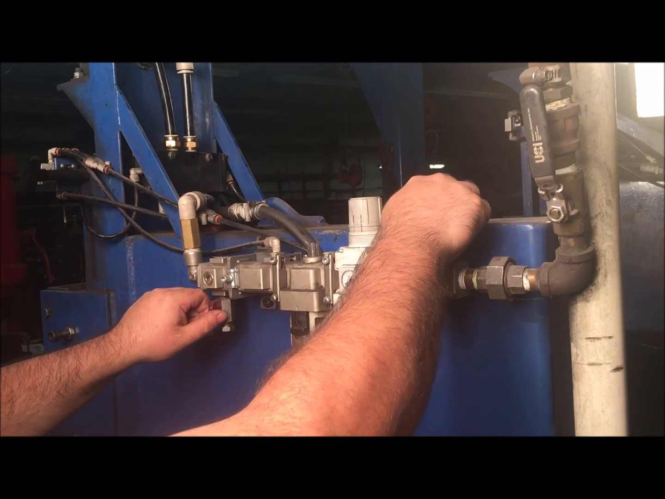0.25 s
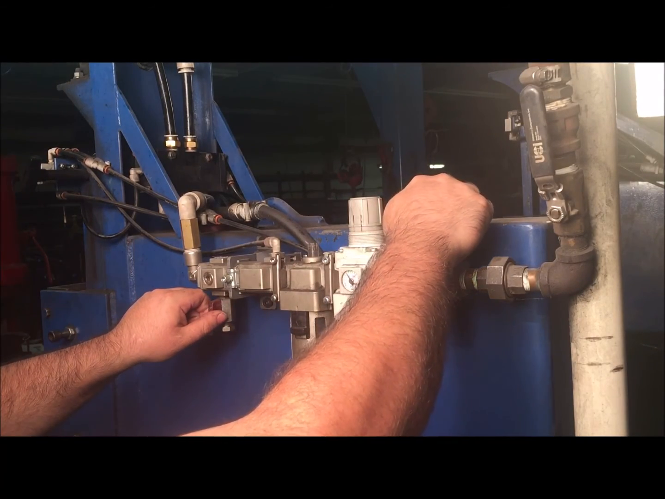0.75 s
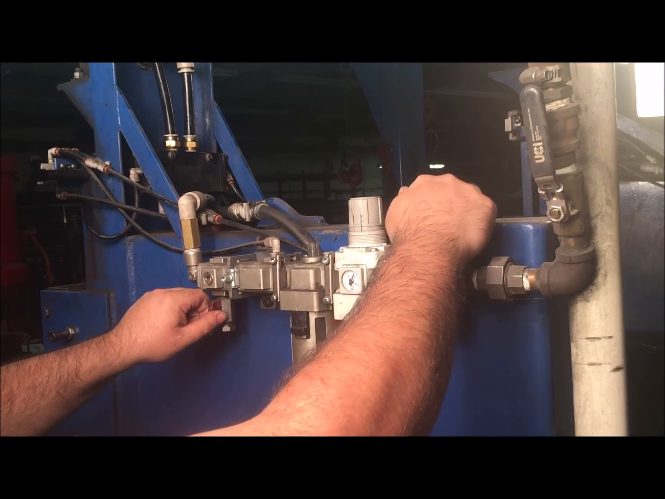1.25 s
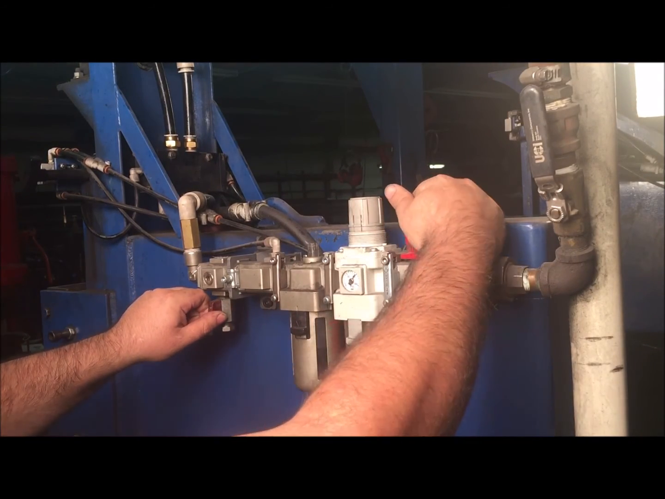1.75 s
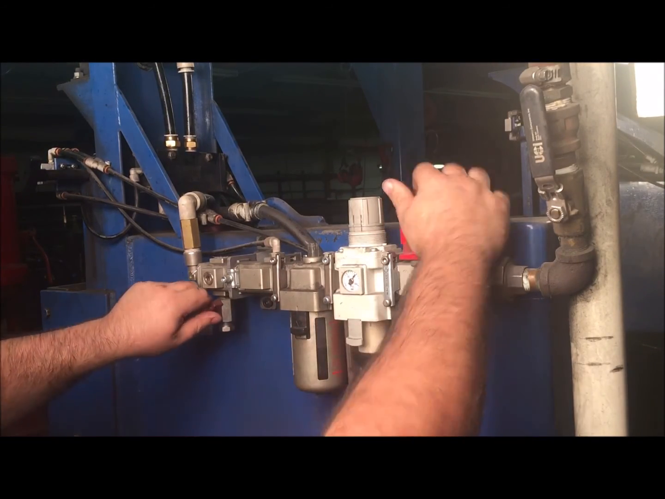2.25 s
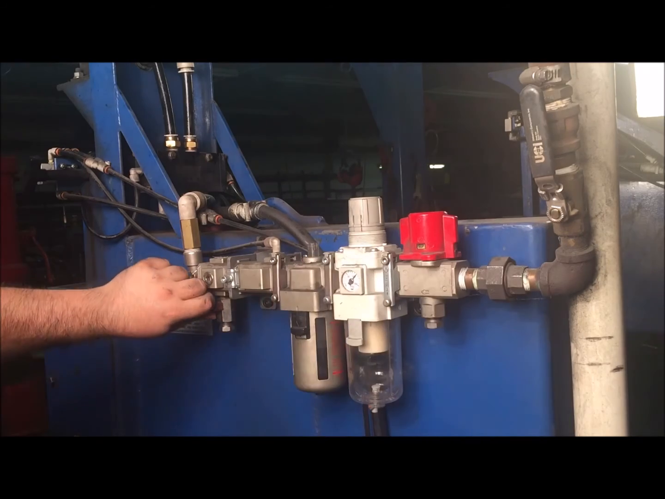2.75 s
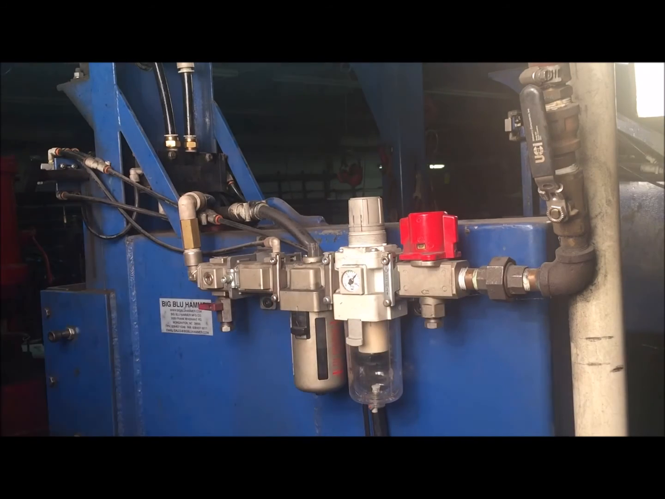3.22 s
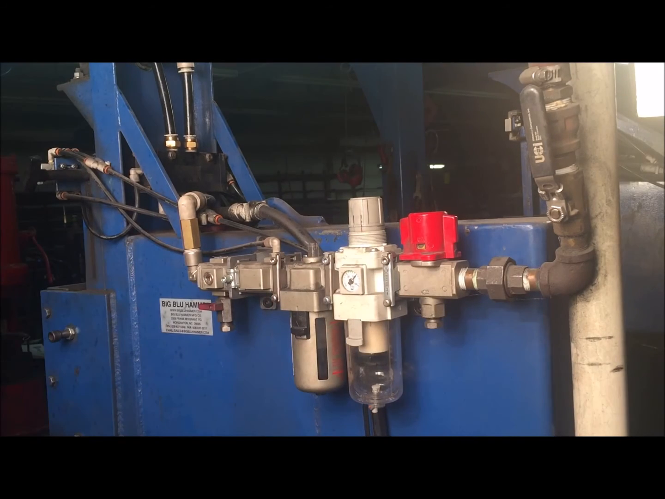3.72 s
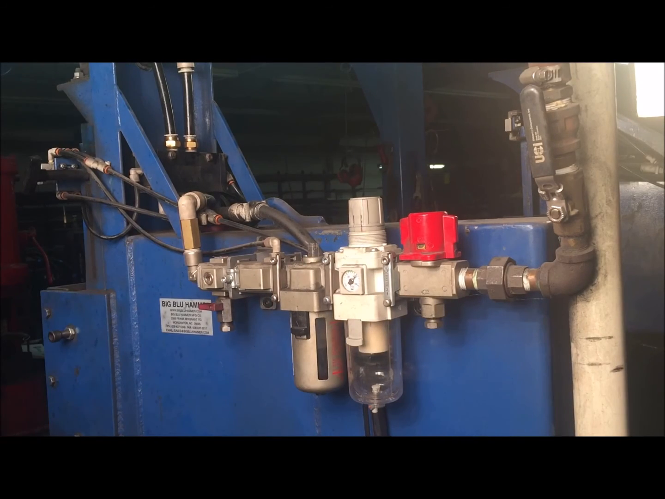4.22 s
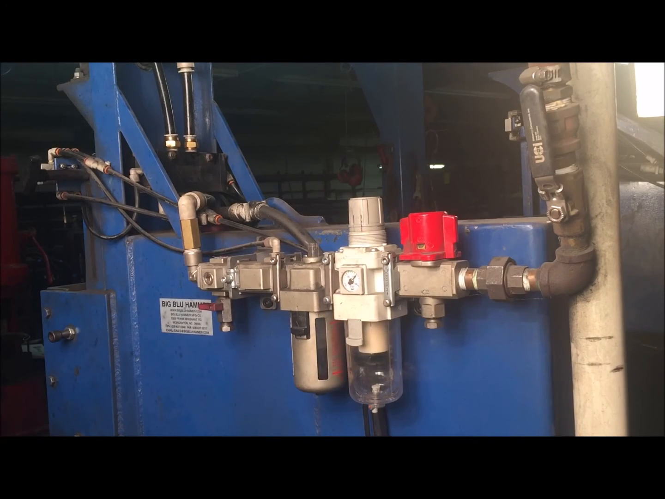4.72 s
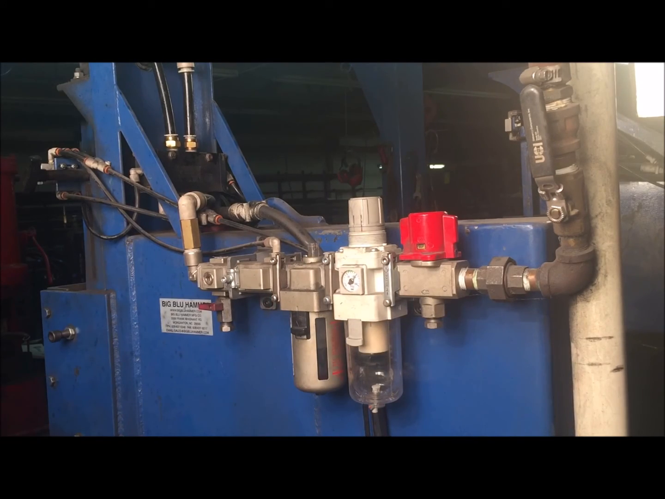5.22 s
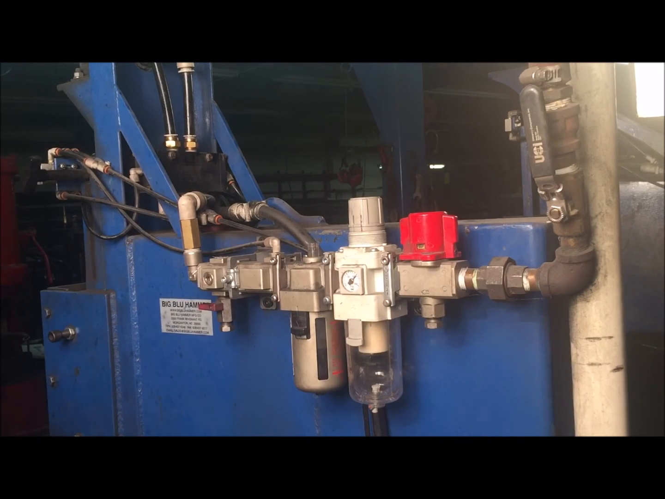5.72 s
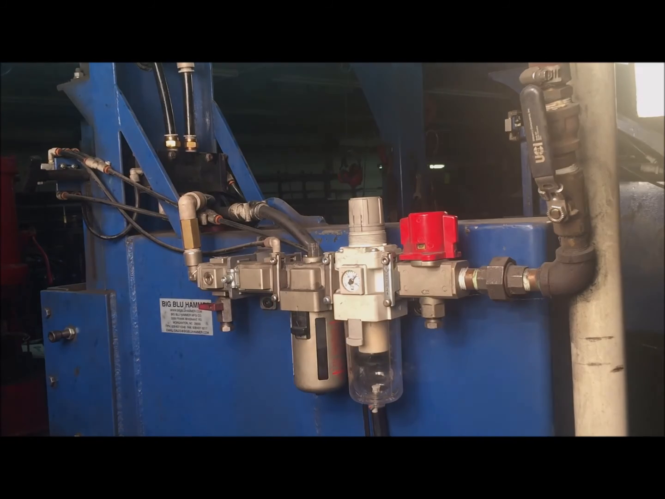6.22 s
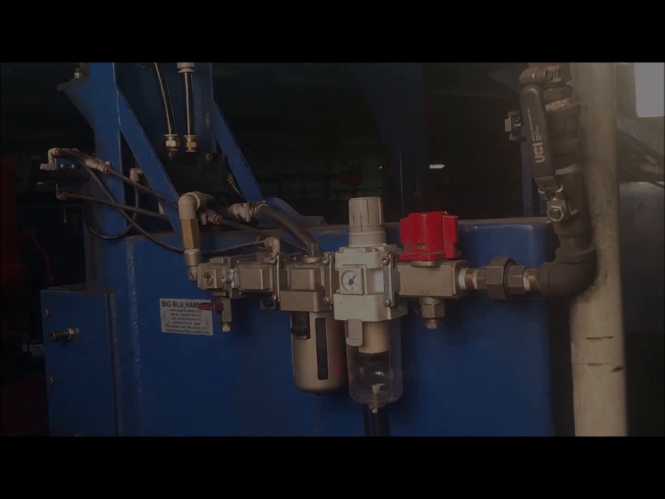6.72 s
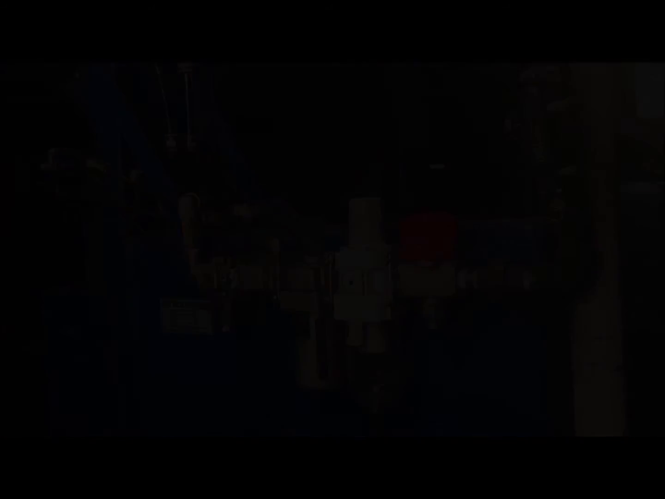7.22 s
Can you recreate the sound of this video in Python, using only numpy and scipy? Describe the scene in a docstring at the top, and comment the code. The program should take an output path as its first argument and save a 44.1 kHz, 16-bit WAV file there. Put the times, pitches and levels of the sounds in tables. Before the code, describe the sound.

Compressed air hisses into a pneumatic power hammer, valve chatters, ram clunks; then exhaust shrieks, the ram cycles freely and lands seven ringing steel blows.

```python
"""A pneumatic power hammer in a workshop, heard through one microphone with faint shop noise and distant motors behind.
The supply valve opens: noise-made air hisses and rumbles in, the valve chatters, and the ram clunks onto its stop.
Then the exhaust hisses and whistles and the valve puffs and clacks once a stroke. The ram slides freely five times,
then lands seven blows: struck modes and decaying noise ring the frame and push the recorder into its limiter.
Just before the end everything but the background breaks off."""
import sys
import numpy as np
from scipy import signal
from scipy.fft import rfft, irfft, next_fast_len
from scipy.io import wavfile
from scipy.ndimage import uniform_filter1d, map_coordinates

SR = 44100
rng = np.random.default_rng(int(sys.argv[2]) if len(sys.argv) > 2 else 0)


def unload_wav(signal):
    """Save mono or channel-first audio to the path in sys.argv[1] as 16-bit WAV at rate SR, clipped to [-1, 1]."""
    wavfile.write(
        sys.argv[1],
        SR,
        np.round(np.clip(np.atleast_2d(signal).T, -1, 1) * 32767).astype(np.int16),
    )


N = 328970
TIME = np.arange(N) / SR
START_S, STOP_S = 3.422, 7.394  # exhaust starts; machine breaks off
FIRST_TURN_S, FREE_STROKE_S, FREE_STROKES = 3.416, 0.344, 5  # the first strokes do not reach the anvil
KNOCK_DELAY_S = 0.0915  # from a reversal to the ram turning round


def from_db(db):
    """Decibels to gain."""
    return 10 ** (np.asarray(db) / 20)


def rms_one(x):
    """Scale to unit power."""
    return x / np.sqrt(np.mean(x ** 2) + 1e-20)


def along(rows, x):
    """Read each column of a curve at x."""
    first, *columns = np.transpose(rows)
    return [np.interp(x, first, column) for column in columns]


def at_hz(points, hz):
    """Read a spectrum on a log-frequency axis."""
    f, value = np.transpose(points)
    return np.interp(np.log(hz + 1e-3), np.log(f), value)


def noise(spectrum, size=N):
    """Noise of a given colour that falls away steeply below the lowest point; rms 1."""
    padded = next_fast_len(size)
    hz = np.fft.rfftfreq(padded, 1 / SR)
    low_cut = np.minimum(hz / spectrum[0][0], 1) ** 2
    gain = from_db(at_hz(spectrum, hz)) * low_cut
    white = rng.standard_normal(padded)
    return rms_one(irfft(rfft(white) * gain, padded)[:size])


def wander(rate_hz):
    """Smooth random motion of rms 1, from noise through a double low-pass pole."""
    r = np.exp(-2 * np.pi * rate_hz / SR)
    return rms_one(signal.lfilter([1], [1, -2 * r, r * r], rng.standard_normal(N)))


def whistle(hz, spread_hz):
    """A resonance blown by turbulence: a tone of wandering strength and phase; rms 1."""
    phase = 2 * np.pi * np.cumsum(hz * np.ones(N)) / SR
    return rms_one(wander(spread_hz) * np.cos(phase) + wander(spread_hz) * np.sin(phase))


def add(out, s, sound):
    """Mix a sound in at time s."""
    at = round(s * SR)
    out[at:at + len(sound)] += sound[:N - at]


def bursts(events, colour, gain_db, rise_s, decay_s, sag=0):
    """Short noise bursts that swell and die, half alike each time; the pitch of an air cavity sags as it opens."""
    size, lead = SR // 3, SR // 16
    t, out = (np.arange(size) - lead) / SR, np.zeros(N)
    envelope = np.exp(np.minimum(t / rise_s, -t / decay_s))
    # reading the noise ever more slowly lowers its pitch
    reading = np.cumsum(1 - sag * np.tanh(t / decay_s / 2 - 0.5))
    same = noise(colour, size=size)
    for s, db in events:
        mixed = rms_one(same + noise(colour, size=size))
        sound = map_coordinates(mixed, [reading], order=3)
        add(out, s - lead / SR, from_db(db + gain_db) * envelope * sound)
    return out


def ring(modes, t, uneven_db=0):
    """Struck modes die exponentially; the higher ones answer differently to each hit."""
    out = 0
    for k, (hz, db, t60) in enumerate(modes):
        # unevenness grows up to 2 kHz: high modes depend on just where a hit lands
        chance_db = uneven_db * min(hz / 2000, 1) * rng.standard_normal()
        out = out + (-1) ** k * from_db(db + chance_db - 60 * t / t60) * np.sin(2 * np.pi * hz * t)
    return out


def dense_ring(spectrum, t60s, t):
    """Countless close modes: third-octave noise bands, each dying at its own rate; about rms 1 at the start."""
    out, power, edges = 0, 0, 90 * 2 ** (np.arange(23) / 3)
    for low, high in zip(edges, edges[1:]):
        hz = np.sqrt(low * high)
        dying = rng.standard_normal(len(t)) * from_db(-60 * t / at_hz(t60s, hz))
        gain = from_db(at_hz(spectrum, hz))
        band = signal.butter(2, [low, high], "band", fs=SR, output="sos")
        out = out + gain * signal.sosfilt(band, dying)
        power += gain ** 2 * (high - low) / (SR / 2)
    return out / np.sqrt(power)


def through_steel(sound, lag_s, corner_hz):
    """Bending waves: the lows arrive after the highs, so every impact chirps downward."""
    size = 2 * len(sound)
    hz = np.fft.rfftfreq(size, 1 / SR)
    delay = np.exp(-2j * np.pi * lag_s * corner_hz * np.arctan(hz / corner_hz))
    return irfft(rfft(sound, size) * delay)[:len(sound)]


# Cylinder wall resonances: (frequency [Hz], width [Hz], level added to the direct sound [dB])
CASING_MODES = [(1111, 47, 10), (2463, 120, 3.5)]


def casing(x):
    """The cylinder's steel wall rings along with whatever moves inside it."""
    out = x
    for hz, width_hz, db in CASING_MODES:
        r = np.exp(-np.pi * width_hz / SR)
        zeros = (1 - r * r) / 2 * np.array([1, 0, -1])
        poles = [1, -2 * r * np.cos(2 * np.pi * hz / SR), r * r]
        out = out + from_db(db) * signal.lfilter(zeros, poles, x)
    return out


def workshop(x, wet_db, t60):
    """Close steel surfaces throw back a short, dense echo."""
    t = np.arange(SR // 3) / SR
    echo = rng.standard_normal(len(t)) * from_db(-60 * t / t60) * (t > 0.002)
    wet = from_db(wet_db)
    reflected = signal.fftconvolve(x, echo / np.linalg.norm(echo))[:N]
    return (x + wet * reflected) / np.sqrt(1 + wet ** 2)


# Valve clacks over at the end of every stroke: (time [s], relative level [dB])
VALVE_REVERSALS = [(3.7593, -13.5), (4.1045, -13), (4.4492, -13), (4.7915, -13.5), (5.133, -13),
                   (5.4605, -13), (5.7828, -13), (6.101, -14.5), (6.4204, -15.5), (6.7387, -15),
                   (7.0581, -14.5), (7.379, -15)]


def reversals():
    """Times at which a stroke begins."""
    return np.array([FIRST_TURN_S] + [s for s, _ in VALVE_REVERSALS])


def striking_for(s):
    """Seconds of hammering gone by at time s."""
    return np.maximum(s - reversals()[FREE_STROKES], 0)


def stroke_share():
    """How far through its stroke the ram is, 0 to 1."""
    turns = reversals()
    return np.interp(TIME, turns, np.arange(len(turns))) % 1


# Distant motors: (frequency [Hz], mean level [dB])
MOTOR_HUM = [(64.6, -69), (96.9, -68)]
# Colour of the shop noise: (frequency [Hz], relative level per Hz [dB])
SHOP_COLOUR = [(30, -12), (75, 9), (140, -4), (250, -12), (1100, -20), (7500, -25.5), (16000, -38.5)]


def background():
    """Distant motors hum as slowly wavering tones over faint, steady shop noise."""
    hum = 0
    for hz, db in MOTOR_HUM:
        level = from_db(db + 1.5 * wander(2.8)) * np.sqrt(2)
        hum = hum + level * np.sin(2 * np.pi * hz * TIME + 0.54 * wander(2))
    return hum + from_db(-65) * noise(SHOP_COLOUR)


# Air jet in the supply valve: (time [s], relative level [dB])
JET_LEVEL = [(.6, -49.5), (1.19, -42.5), (1.39, -50), (1.8, -43.5), (2.29, -43), (2.41, -36.5),
             (2.82, -40.5), (2.88, -55), (3.02, -70)]
# The jet's colour as the valve opens and the pressure evens out: (time [s], stage [0-3])
OPENING_STAGE = [(1.14, 0), (1.3, 1), (2.28, 1), (2.42, 2), (2.62, 2), (2.71, 3)]
# Jet colours of stages 0 to 3: (frequency [Hz], relative level per Hz [dB])
CRACKED_COLOUR = [(500, -19), (1300, -10), (2050, -20.5), (2350, -2.5), (2600, -8.5), (3500, 0),
                  (4800, -10.5), (6200, -1), (7800, -10), (10000, -15), (15500, -17.5)]
OPEN_COLOUR = [(500, -5), (1500, -18.5), (3000, -2.5), (5500, 3.5), (7200, 3.5), (10300, -4), (15500, -5)]
RUSH_COLOUR = [(600, -19), (1900, -16.5), (3200, -11.5), (4800, -6.5), (7000, 0.5), (9000, -5),
               (11200, -18.5), (15500, -13)]
DYING_COLOUR = [(700, -22), (2000, -6.5), (3100, -13), (5600, 2.5), (8300, -12), (10500, -28), (15500, -34)]
# Colour of the pipe's rumble: (frequency [Hz], relative level per Hz [dB])
PIPE_COLOUR = [(60, -4.5), (170, 0), (300, 0), (520, -6), (1100, -8.5), (2500, -13.5), (6000, -56)]
# Rumble in the pipe, before the flow's fades: (time [s], level [dB])
PIPE_RUMBLE = [(0.55, -51.5), (0.72, -63), (0.86, -59), (1.16, -48.5), (2.27, -50), (2.51, -58.5),
               (3.0, -78.5)]


def filling():
    """Air squeezes through the supply valve and rumbles down the pipe until the pressure is level."""
    jet_db, = along(JET_LEVEL, TIME)
    stage, = along(OPENING_STAGE, TIME)
    pipe_db, = along(PIPE_RUMBLE, TIME)
    flowing = np.interp(TIME, [0.545, 0.565, 2.95, 3.15], [0, 1, 1, 0])
    jet = 0
    for k, colour in enumerate([CRACKED_COLOUR, OPEN_COLOUR, RUSH_COLOUR, DYING_COLOUR]):
        share = np.sqrt(np.clip(1 - abs(stage - k), 0, 1))  # equal-power blend between stages
        jet = jet + share * noise(colour)
    # the last of the flow is 9 dB weaker and unsteady
    levelled = np.clip(stage - 2, 0, 1)
    sputter_db = (0.5 + 2.2 * levelled) * wander(60) - 9 * levelled
    hiss = from_db(jet_db + 1 + sputter_db) * jet
    rumble = from_db(pipe_db) * noise(PIPE_COLOUR)
    return flowing * (hiss + valve_seat() + rumble)


UNSEATING_S, UNSEATING_DB = 0.549, -37  # relative level of the knock
SEAT_HZ, SEAT_DB, SEAT_FADE_DB_PER_S = 3620, -51.5, 6.5
FLARE_S, FLARE_WIDTH_S, FLARE_DB, FLARE_RISE_HZ = 2.37, 0.054, -39.5, 1310


def valve_seat():
    """The seat's breathy whistle fades slowly, then flares and glides up as the valve opens wide."""
    opened = (TIME - FLARE_S) / FLARE_WIDTH_S
    wide = (1 + np.tanh(opened)) / 2
    narrow = from_db(SEAT_DB - SEAT_FADE_DB_PER_S * (TIME - UNSEATING_S)) * (1 - wide)
    flare = from_db(FLARE_DB) * np.exp(-opened ** 2)
    return (narrow + flare) * whistle(SEAT_HZ + FLARE_RISE_HZ * wide, spread_hz=770)


# Air column in the cylinder: (settled frequency [Hz], relative level [dB], t60 [s])
AIR_COLUMN = [(423, -5.5, 0.056), (532, -5, 0.067), (610, -8, 0.059), (1690, -15, 0.053)]


def hollow_knocks(sag=0.17, sag_s=0.0065):
    """Unseating and free turns ring the cylinder's air; the pitch starts high and settles as the ram moves off."""
    events = [(UNSEATING_S, UNSEATING_DB)]
    events += [(s + KNOCK_DELAY_S, -18) for s in reversals()[:FREE_STROKES]]
    t, out = np.arange(SR // 4) / SR, np.zeros(N)
    clock = t + sag * sag_s * (1 - np.exp(-t / sag_s))
    air = sum(from_db(db - 60 * t / t60) * np.sin(2 * np.pi * hz * clock) for hz, db, t60 in AIR_COLUMN)
    for s, db in events:
        add(out, s, from_db(db) * air * (1 - np.exp(-t / 0.0008)))
    return out


# Sharp clicks of the machine, one of them the bright crack of the clunk: (time [s], relative level [dB])
SHARP_CLICKS = [(0.5671, -28), (1.2311, -16), (3.052, -54.5), (3.4226, -30)]
# Colour of a click, also of the spool's crack: (frequency [Hz], relative level per Hz [dB])
CLICK_COLOUR = [(400, -19), (1500, -3), (3300, 1), (5200, -1), (8000, -10), (15000, -23.5)]


def sharp_clicks():
    """Sharp clicks of the machine, one of them the bright crack of the clunk: noise bursts with a very fast rise."""
    return bursts(SHARP_CLICKS, CLICK_COLOUR, gain_db=-5, rise_s=0.00033, decay_s=0.0087)


# Valve chatters as pressure builds; the last row throws it open: (time [s], relative level [dB])
VALVE_CHATTER = [(.876, -37.5), (.912, -38), (.941, -33.5), (0.986, -41), (1.017, -31.5), (1.047, -36),
                 (1.1, -32.5), (1.158, -20.5), (3.4214, -19)]
# Colour of a puff at the valve: (frequency [Hz], relative level per Hz [dB])
PUFF_COLOUR = [(400, -16.5), (1130, 0), (1650, -15.5), (2250, -3), (2520, -2), (2850, -13.5), (12000, -18)]


def puffs():
    """Air squirts past the spool 7 ms before it clacks, in bursts of sagging pitch."""
    events = [(s - 0.007, db) for s, db in VALVE_CHATTER[:-1] + VALVE_REVERSALS]
    return bursts(events, PUFF_COLOUR, gain_db=-9.5, rise_s=0.0041, decay_s=0.013, sag=0.1)


# Valve body, before each hit's unevenness: (frequency [Hz], relative level [dB], t60 [s])
VALVE_BODY = [(683, -19, 0.21), (796, -15.5, 0.15), (936, -16.5, 0.13), (1124, 4.5, 0.017),
              (1165, -6, .074), (1330, -17.5, 0.19), (1390, -16, 0.21), (1515, -11.5, 0.063),
              (1990, -14, 0.06)]


def clacks(crack_db=-10, crack_decay_s=0.011):
    """The spool hits its end stop: a bright crack, then the body rings; glancing touches ring it less evenly."""
    events = VALVE_CHATTER + VALVE_REVERSALS
    t, out = np.arange(SR // 4) / SR, np.zeros(N)
    hardest_db = max(db for _, db in events)
    for s, db in events:
        crack = from_db(crack_db) * noise(CLICK_COLOUR, size=len(t)) * np.exp(-t / crack_decay_s)
        body = ring(VALVE_BODY, t, uneven_db=2 + (hardest_db - db) / 5)
        add(out, s, from_db(db) * (crack + through_steel(body, lag_s=0.00802, corner_hz=601)))
    return out


# Frame and anvil, before each hit's unevenness: (frequency [Hz], relative level [dB], t60 [s])
FRAME_MODES = [(60, -27.5, 0.44), (81, -19.5, 0.44), (84, -29, 0.36), (103.4, -15, 0.16),
               (113.7, -35.5, .9), (137, -29.5, .9), (172.8, -13, 0.23), (158.8, -23.5, 0.46),
               (215, -26.5, 0.49), (235, -26.5, .48), (304, -3.5, 0.029), (325.3, -22.5, .25),
               (503.6, -28.5, 0.28), (586, -22.5, 0.1), (651, -26.5, .4), (700, -18.5, .15),
               (805, -27, 0.17), (892, -11.5, 0.037), (1140, -23.5, 0.24), (1172, -14.5, 0.077),
               (1270, -16.5, 0.13), (1363, -32, 0.32), (1424, -30.5, .2), (1984, -25, .17),
               (2096, -30.5, .27), (2325, -25, 0.14), (2800, -26.5, .1), (3142, -27, 0.27),
               (3530, -30.5, 0.21), (4000, -28, 0.16), (4332, -31.5, 0.31), (4430, -27.5, .15)]
# The crowd of smaller steel modes: (frequency [Hz], relative level per Hz [dB])
CLANG_COLOUR = [(100, -13.5), (400, 2.5), (900, 0), (2600, -6.5), (4200, -8.5), (8500, -13), (11000, -40.5)]
# How long the clang and the rattle last: (frequency [Hz], t60 [s])
STEEL_T60 = [(100, 0.54), (400, 0.28), (1500, 0.28), (4000, 0.37), (12000, 0.35)]
# Colour of the rattling loose parts: (frequency [Hz], relative level per Hz [dB])
RATTLE_COLOUR = [(250, -11.5), (600, 1.5), (2500, -0.5), (4500, -8.5), (8000, -13), (16000, -37.5)]
# Colour of the hall's answer to a blow: (frequency [Hz], relative level per Hz [dB])
HALL_COLOUR = [(90, 3), (220, 6), (400, -15), (1200, -7), (4000, -32.5)]


def frame_blows(events, modes_db, clang_db, rattle_db, rattle_s, jolt_db, echo_db):
    """Blows ring the frame: lows near alike, top modes uneven, loose parts jolting and rattling, the hall answering."""
    t, out = np.arange(SR) / SR, np.zeros(N)
    clang = from_db(clang_db) * dense_ring(CLANG_COLOUR, STEEL_T60, t) * (1 - np.exp(-t / 0.0011))
    hall_t60 = [(100, 0.88), (10000, 0.44)]  # (frequency [Hz], t60 [s])
    hall = from_db(echo_db) * dense_ring(HALL_COLOUR, hall_t60, t) * (1 - np.exp(-t / 0.01))
    for s, force_db in events:
        rattle = from_db(rattle_db) * (1 - np.exp(-t / rattle_s))
        jolt = from_db(jolt_db) * np.exp(-t / 0.013)
        loose = (rattle + jolt) * dense_ring(RATTLE_COLOUR, STEEL_T60, t)
        frame = from_db(modes_db) * ring(FRAME_MODES, t, uneven_db=3.5) + clang + loose
        add(out, s, from_db(force_db) * through_steel(frame + hall, lag_s=0.006, corner_hz=401.6))
    return out


def stop_clunk():
    """The ram lands softly on its stop as the machine fills, ringing the frame once."""
    return frame_blows([(1.2281, -8.5)], modes_db=1.0, clang_db=-13.5, rattle_db=-15.5,
                       rattle_s=0.0087, jolt_db=-17.5, echo_db=-29)


# One dry, short valve tap: (time [s], relative level [dB])
VALVE_TAP = (1.965, -21.5)
# Colour of the valve's tap and the linkage's taps: (frequency [Hz], relative level per Hz [dB])
TAP_COLOUR = [(200, -50), (600, 2), (1120, 1), (1700, -5), (3000, -9), (6000, -11.5), (13000, -27.5)]


def valve_tap():
    """One dry, short valve tap: a noise burst with a fast rise."""
    return bursts([VALVE_TAP], TAP_COLOUR, gain_db=-6.5, rise_s=0.00073, decay_s=0.0078)


GROAN_S, GROAN_WIDTH_S, GROAN_HZ, GROAN_SAG_HZ_PER_S = 2.805, 0.037, 297, 330


def groan():
    """The last air flutters the valve seat: a tone sinking in pitch, with a breathy rasp above."""
    t = TIME - GROAN_S
    phase = 2 * np.pi * np.cumsum(GROAN_HZ - GROAN_SAG_HZ_PER_S * t) / SR
    tone = np.sqrt(2) * np.sin(phase)
    rasp = whistle(1950, spread_hz=760)
    swell = np.exp(-(t / GROAN_WIDTH_S) ** 2 / 2)
    return swell * (from_db(-63.5) * tone + from_db(-57) * rasp)


# Colour of the exhaust jet: (frequency [Hz], relative level per Hz [dB])
EXHAUST_COLOUR = [(62, 2.5), (200, -6), (2000, -4.5), (3600, -4.5), (5000, -1.5), (6300, 7), (7700, -1),
                  (9500, -0.5), (10400, -15), (11500, -3.5), (12600, 1), (13900, -5), (15500, -8)]
# Exhaust port's whistles, before bending: (frequency [Hz], spread [Hz], relative level [dB])
PORT_WHISTLES = [(6057, 104, -32), (6300, 170, -41), (6700, 74, -41.5), (7290, 87, -44.5),
                 (9360, 100, -45.5)]
EXHAUST_DB, SAG_DB_PER_S = -29, 2  # overall gain, and its fall as hammering draws the pressure down
SLACK_AT, SLACK_WIDTH, SLACK_DB = 0.23, 0.17, 4  # middle and half-width [shares of a stroke], loss of hiss
EDGE_HZ, EDGE_DB, EDGE_DROP_HZ, EDGE_DROP_DB = 11980, -7, 600, 4  # relative to the exhaust; drops when slack


def exhaust():
    """The exhaust jet hisses and blows its port and edge into whistling; the flow slackens once a stroke."""
    slack = np.exp(-(np.sin(np.pi * (stroke_share() - SLACK_AT)) / (np.pi * SLACK_WIDTH)) ** 2)
    jet = from_db(-0.8 - SLACK_DB * slack + 1.4 * wander(31)) * noise(EXHAUST_COLOUR)
    edge_hz = EDGE_HZ - EDGE_DROP_HZ * slack
    bend = (edge_hz / edge_hz.mean()) ** 0.35  # a faster flow pulls the port's tones up a little too
    port = from_db(27) * sum(from_db(db) * whistle(hz * bend, spread) for hz, spread, db in PORT_WHISTLES)
    edge_level = from_db(EDGE_DB - EDGE_DROP_DB * slack)
    edge_tone = edge_level * whistle(edge_hz * (1 + 0.011 * wander(23)), spread_hz=310)
    gain = from_db(EXHAUST_DB - SAG_DB_PER_S * striking_for(TIME))
    return (TIME > START_S) * gain * (jet + port + edge_tone)


# Colour of the ram sliding in its cylinder: (frequency [Hz], relative level per Hz [dB])
SLIDE_COLOUR = [(100, -37), (220, 5.5), (350, -11), (560, 4.5), (850, -3), (1300, -2.5), (3000, -13.5),
                (6000, -11.5)]


def ram_slide():
    """The ram's sliding noise follows its speed, which is nil at both ends of travel."""
    travel = np.interp(stroke_share(), [0, KNOCK_DELAY_S / FREE_STROKE_S, 1], [0, 1, 2])
    speed = abs(np.sin(np.pi * travel))
    top_speed_db = np.where(striking_for(TIME) > 0, -40.5, -37.5)  # striking, free; before the wall's ring
    rubbing = speed * from_db(top_speed_db + 4.4 * wander(31)) * noise(SLIDE_COLOUR)
    return (TIME > START_S) * casing(rubbing)


# Tight spots of the ram's guides: (time after the reversal [s], relative level [dB])
GUIDE_SPOTS = [(0.138, -22.5), (0.158, -18.5), (.176, -22.5), (0.222, -17.5)]
# Colour of the rasp in the guides: (frequency [Hz], relative level per Hz [dB])
RASP_COLOUR = [(250, -10), (600, -0.5), (1150, -3.5), (2500, -4.5), (3300, -12.5), (7000, -13),
               (13000, -20)]


def guide_rubs():
    """Each free stroke passes every tight spot."""
    return [(s + delay, db) for s in reversals()[:FREE_STROKES] for delay, db in GUIDE_SPOTS]


def guide_rasps():
    """In a free stroke the ram rasps over the tight spots: bursts of rough noise."""
    return bursts(guide_rubs(), RASP_COLOUR, gain_db=-8.5, rise_s=0.0021, decay_s=0.019)


def ticks(events, gain_db, damping):
    """Light steel contacts ring only the frame's upper modes, in a new mix each time, cut short by damping [1/s]."""
    t, out = np.arange(SR // 4) / SR, np.zeros(N)
    upper = [mode for mode in FRAME_MODES if mode[0] > 1000]
    for s, db in events:
        tick = ring(upper, t, uneven_db=5) * np.exp(-damping * t)
        add(out, s + rng.normal(0, 0.003), from_db(db + gain_db) * tick)
    return out


def guide_ticks():
    """The ram ticks against the tight spots of its guides, ringing the upper frame."""
    return ticks(guide_rubs(), gain_db=2.5, damping=64)


def linkage_taps():
    """The linkage taps 54 ms ahead of each reversal, ever more lightly once the ram strikes."""
    events = [(s - 0.054, -21.5 - 2.5 * striking_for(s)) for s, _ in VALVE_REVERSALS]
    return bursts(events, TAP_COLOUR, gain_db=-12, rise_s=0.0028, decay_s=0.016)


# Ram lands on the anvil: (time [s], relative force [dB])
ANVIL_BLOWS = [(5.1931, -2), (5.5176, 0), (5.837, 0), (6.1568, -.5), (6.4758, -.5), (6.7946, -.5),
               (7.1139, -.5)]


def anvil_blows():
    """The ram lands hard on the anvil and rings the frame."""
    return frame_blows(ANVIL_BLOWS, modes_db=0.5, clang_db=-17.5, rattle_db=-15.5,
                       rattle_s=0.024, jolt_db=-14.5, echo_db=-27.5)


# Loose steel parts fall back: (mean time after the blow [s], level relative to its force, before gain [dB])
PART_JUMPS = [(.04, -2.5), (.075, -4.5)]


def loose_parts():
    """Loose steel parts jump after a blow and tick as they fall back."""
    events = [(s + delay * rng.uniform(0.8, 1.2), force_db + db)
              for s, force_db in ANVIL_BLOWS for delay, db in PART_JUMPS]
    return ticks(events, gain_db=-11.5, damping=7.1)


def scene():
    """Air and small parts pass through the near echo; everything but the background breaks off at the end."""
    air = filling() + groan() + exhaust() + puffs() + hollow_knocks()  # the puffs bypass the steel wall
    parts = ram_slide() + casing(guide_rasps() + linkage_taps() + sharp_clicks())
    air_and_parts = workshop(air + parts, wet_db=-7.5, t60=0.08)
    ram = stop_clunk() + anvil_blows() + guide_ticks() + loose_parts()
    sounding = np.clip((STOP_S - TIME) / 0.001, 0, 1)
    machine = air_and_parts + valve_tap() + clacks() + ram
    return (machine * sounding + background())[None]


def record(dry, threshold_db=-4.5, release_db_per_s=60):
    """Behind the microphone a limiter ducks the loudest blows, peaks are rounded and the top is cut."""
    level_db = 20 * np.log10(uniform_filter1d(abs(dry[0]), size=24) + 1e-6)
    over_db = np.maximum(level_db - threshold_db, 0)
    # the gain recovers at a steady rate
    release_db = release_db_per_s * TIME
    held_db = np.maximum.accumulate(over_db + release_db) - release_db
    limited = dry * from_db(-uniform_filter1d(held_db, size=64))
    rounded = limited / (1 + (limited / 0.57) ** 6) ** (1 / 6)
    low_pass = signal.ellip(10, 0.1, 80, 15800, fs=SR, output="sos")  # cut-off 15.8 kHz
    return signal.sosfilt(low_pass, rounded)


dry = scene()
out = record(dry)
unload_wav(out)
```